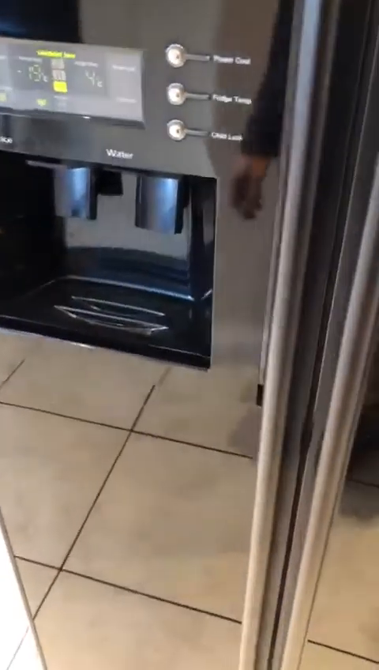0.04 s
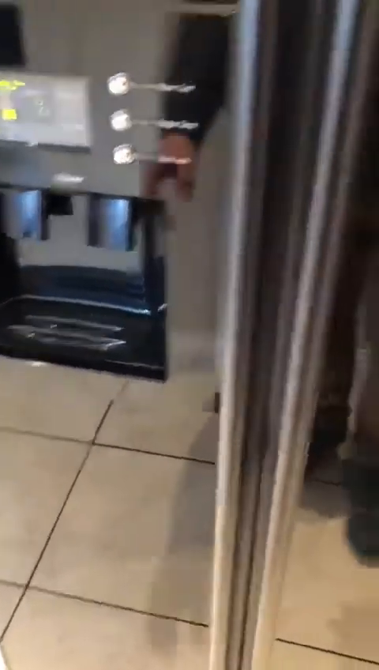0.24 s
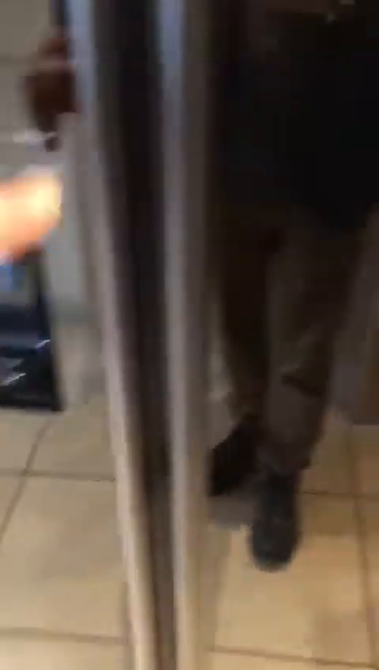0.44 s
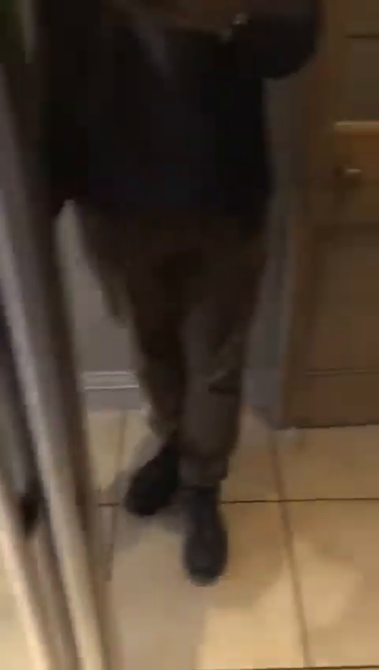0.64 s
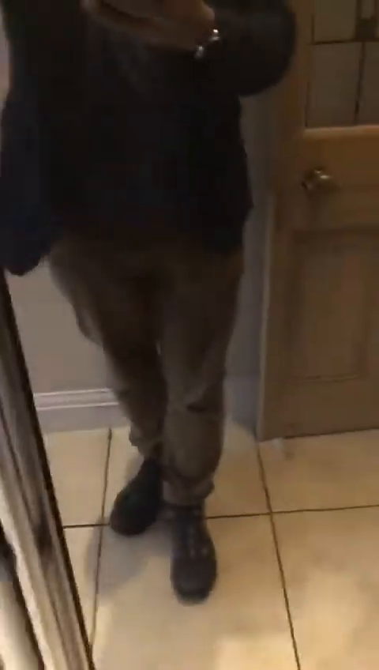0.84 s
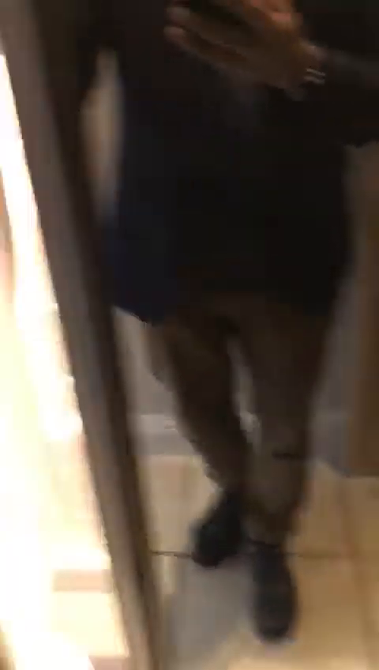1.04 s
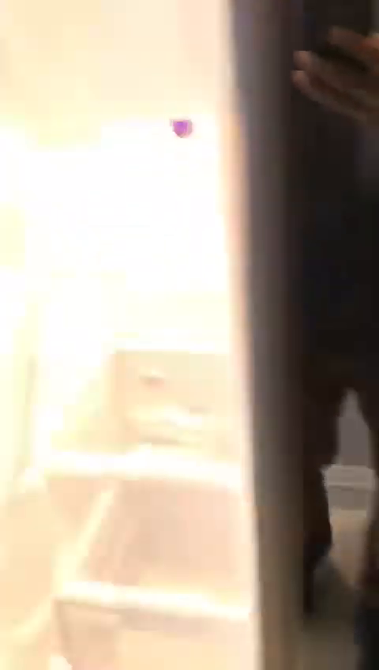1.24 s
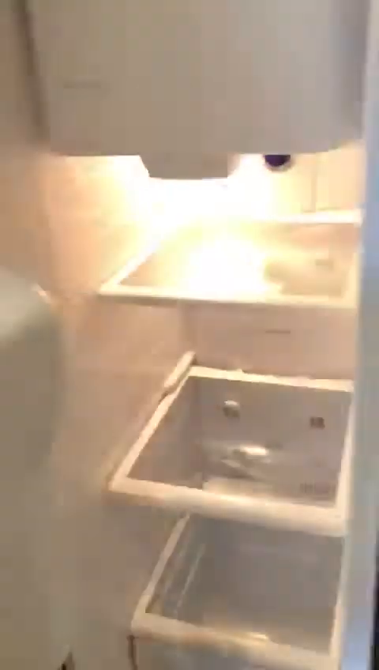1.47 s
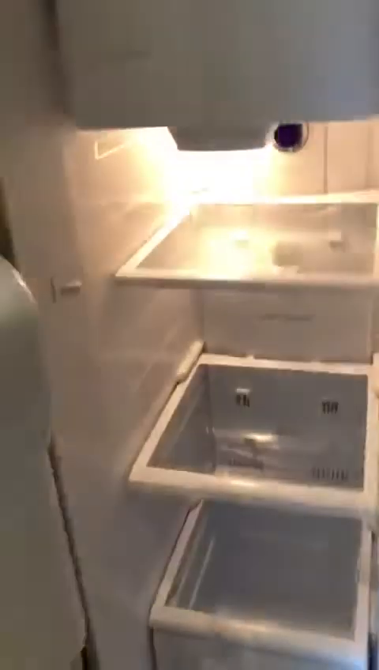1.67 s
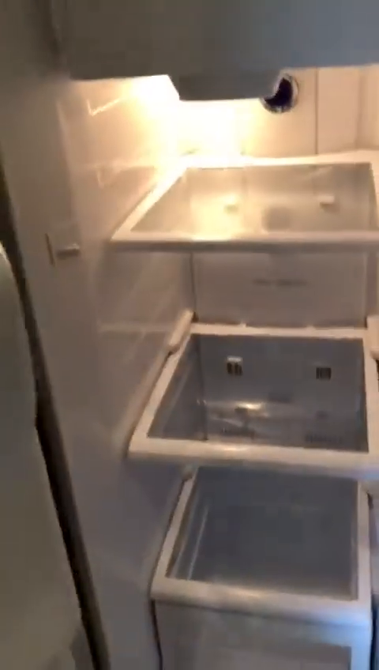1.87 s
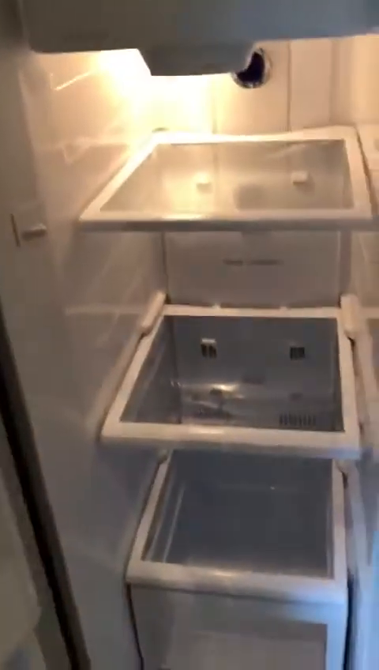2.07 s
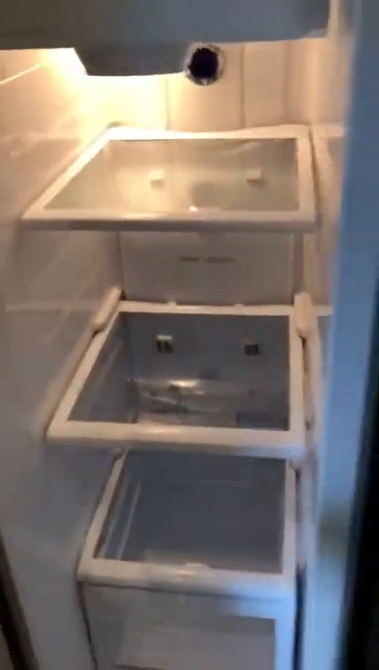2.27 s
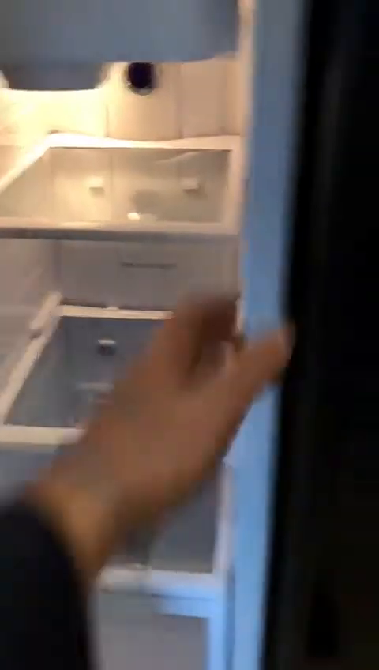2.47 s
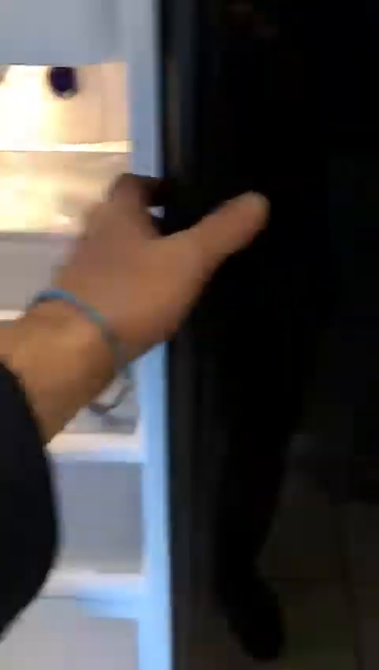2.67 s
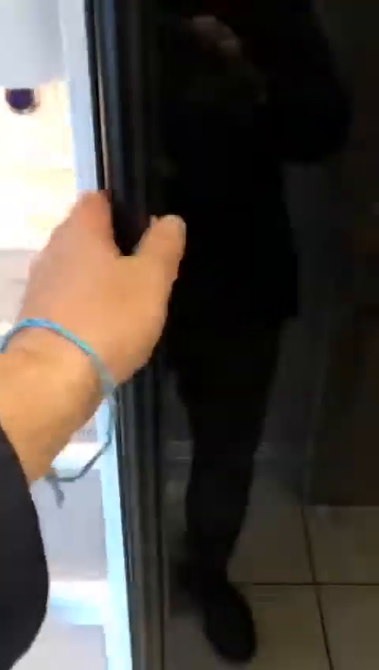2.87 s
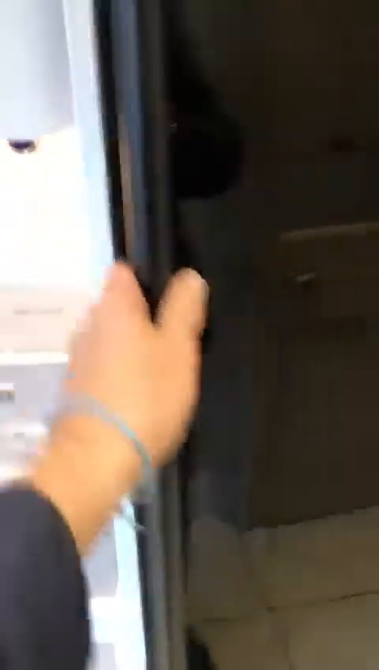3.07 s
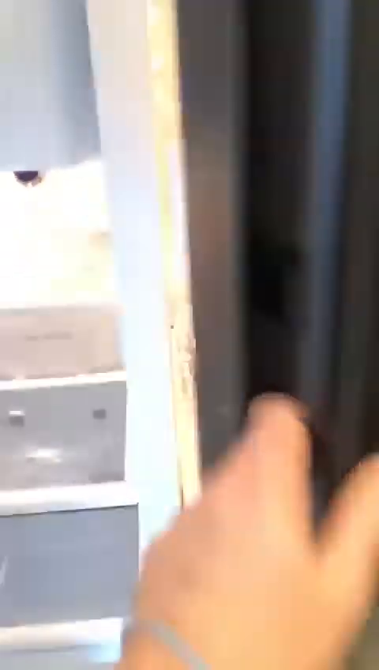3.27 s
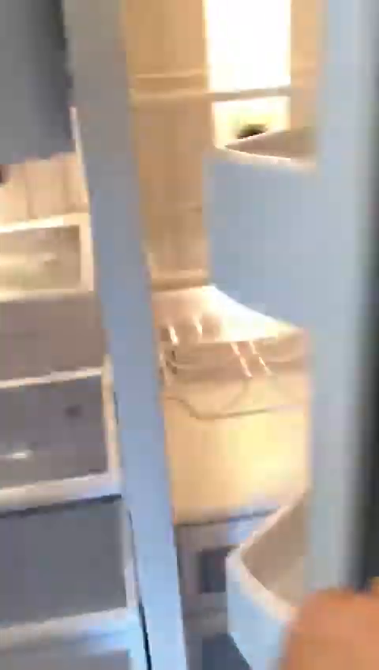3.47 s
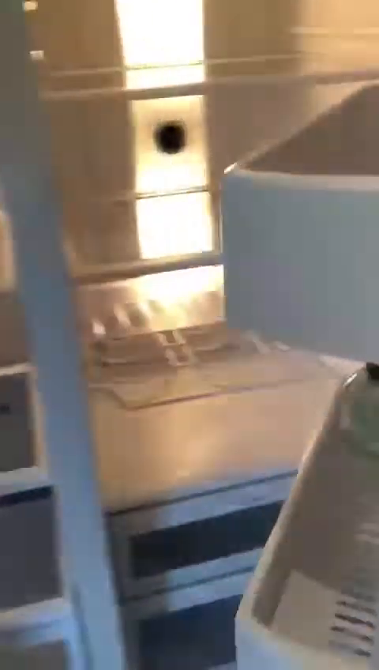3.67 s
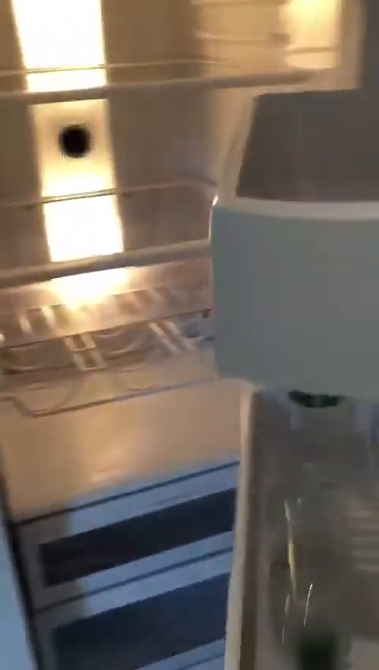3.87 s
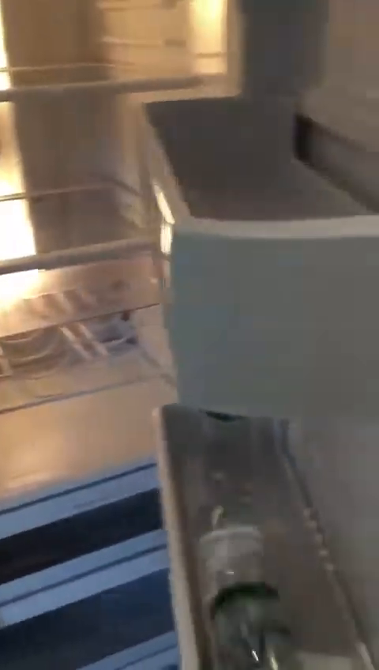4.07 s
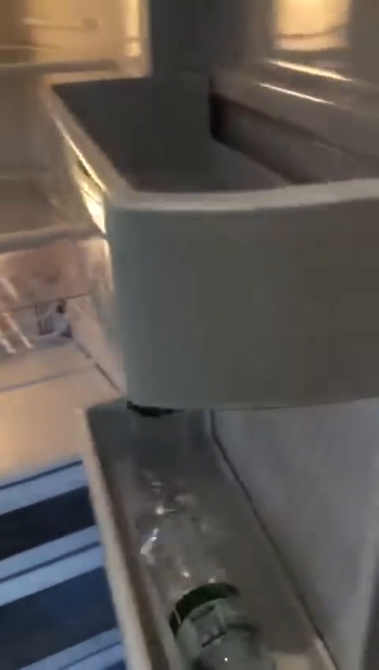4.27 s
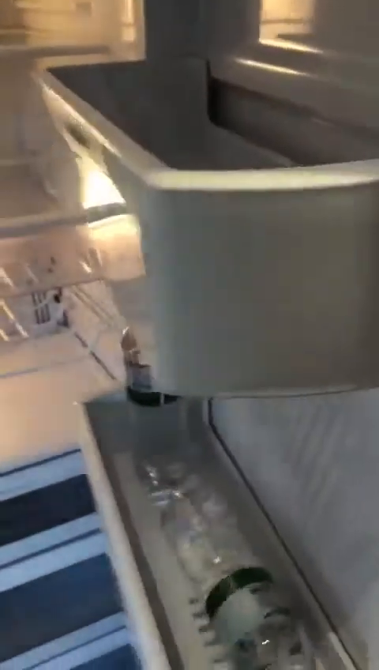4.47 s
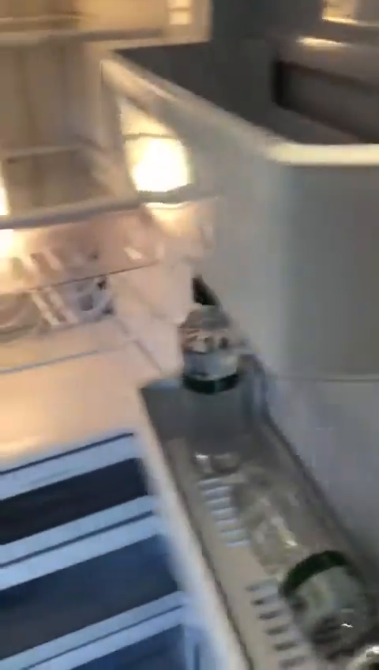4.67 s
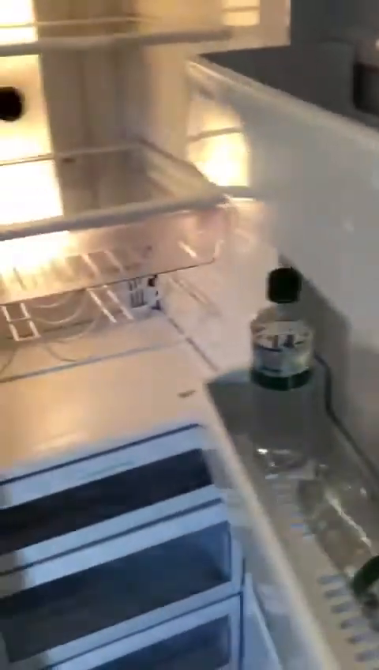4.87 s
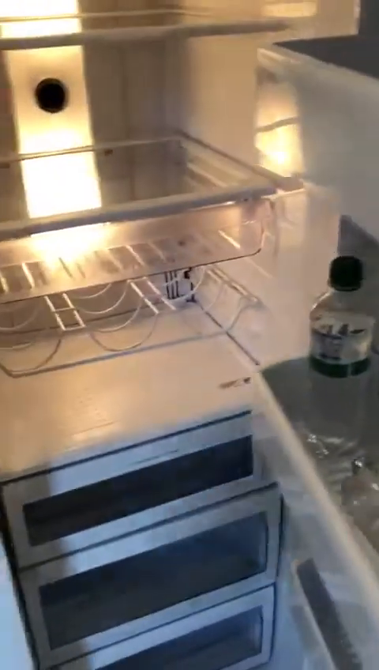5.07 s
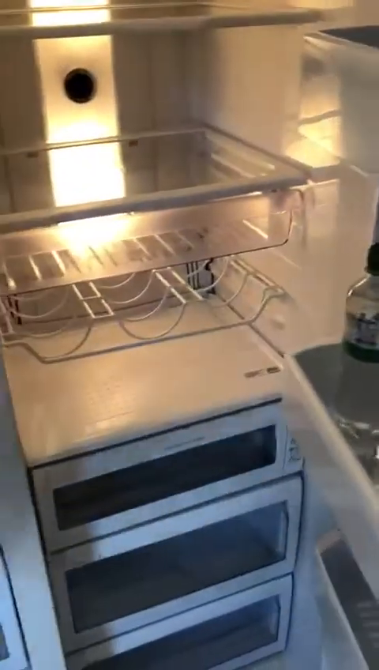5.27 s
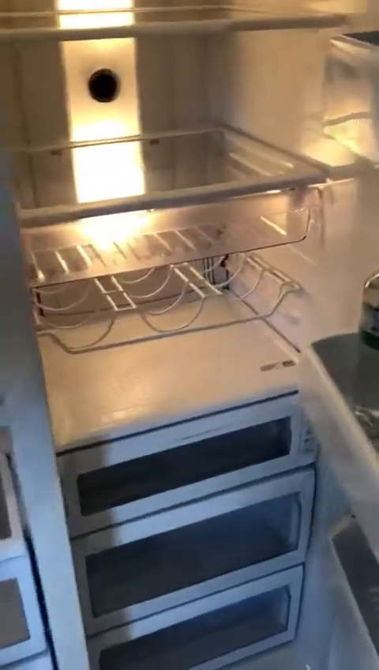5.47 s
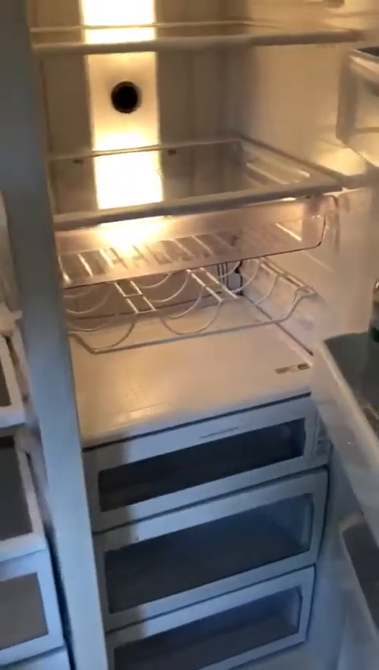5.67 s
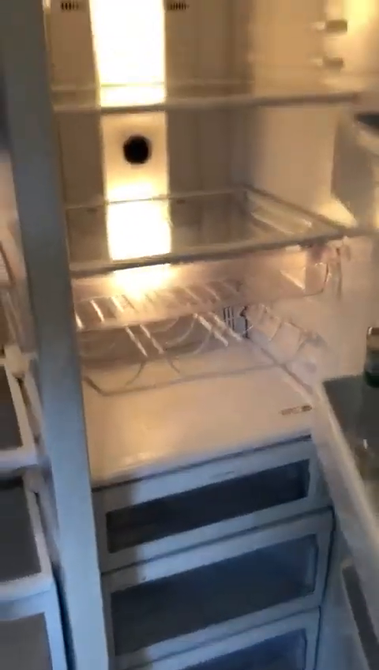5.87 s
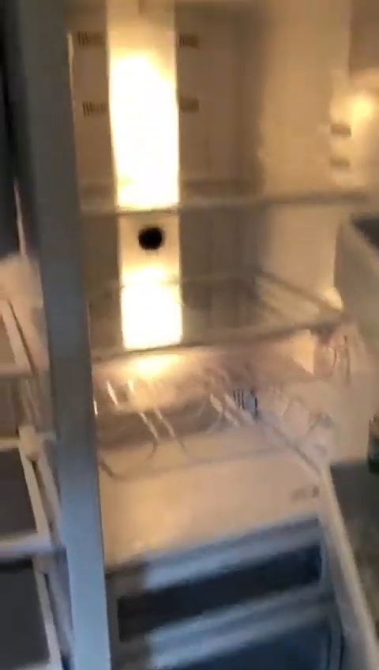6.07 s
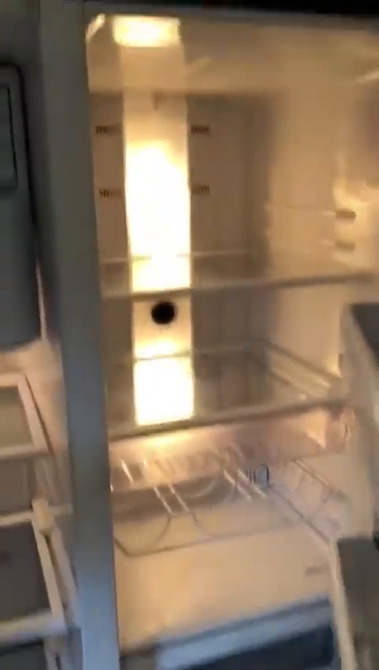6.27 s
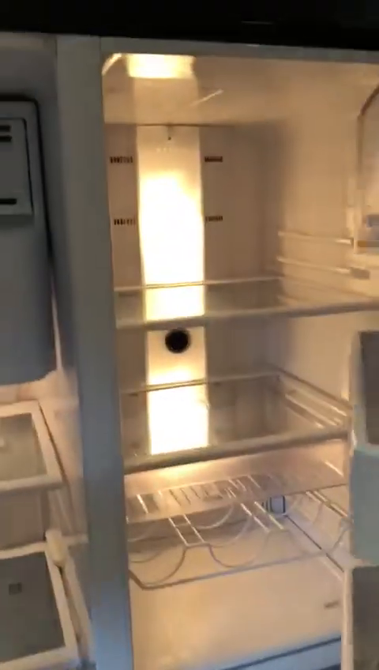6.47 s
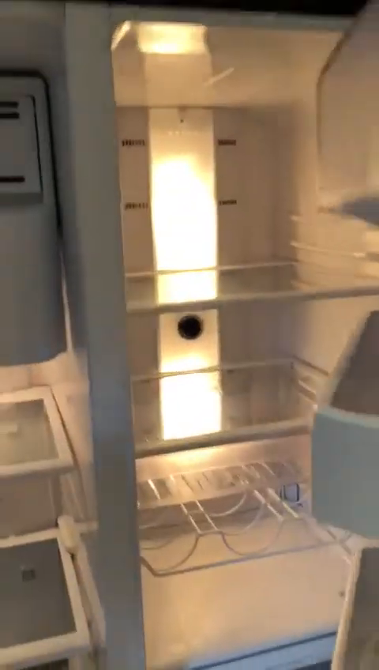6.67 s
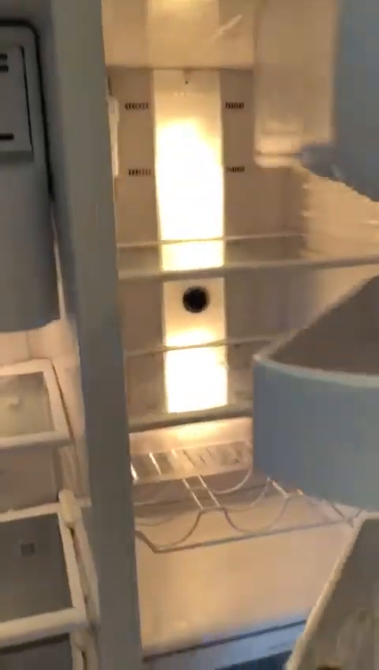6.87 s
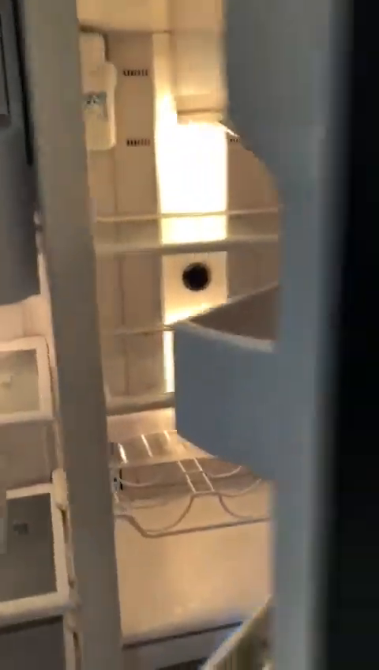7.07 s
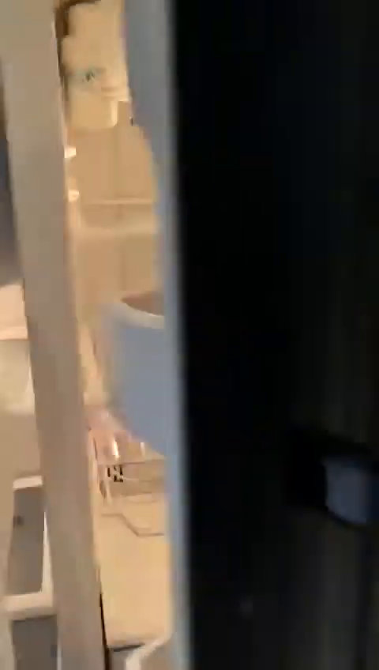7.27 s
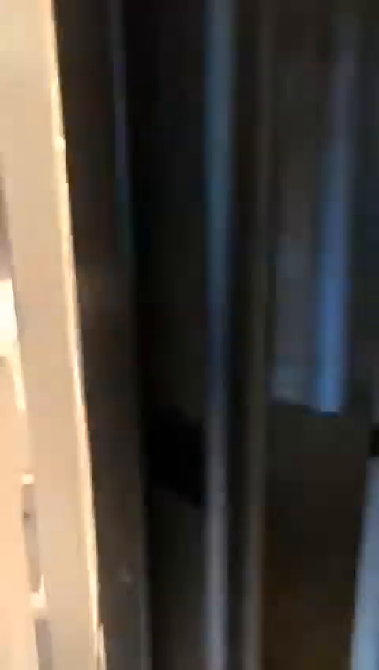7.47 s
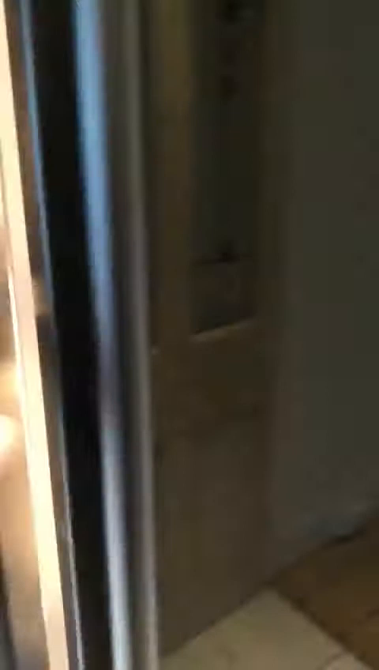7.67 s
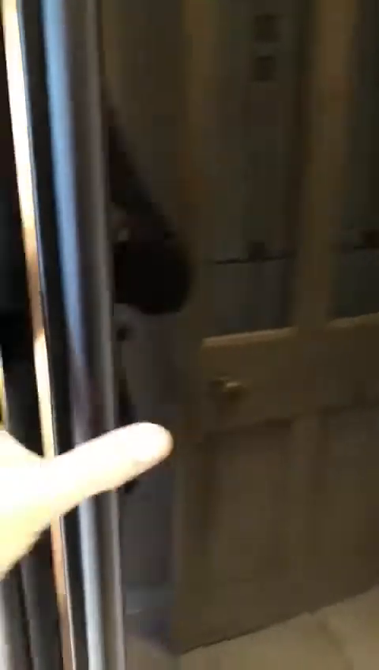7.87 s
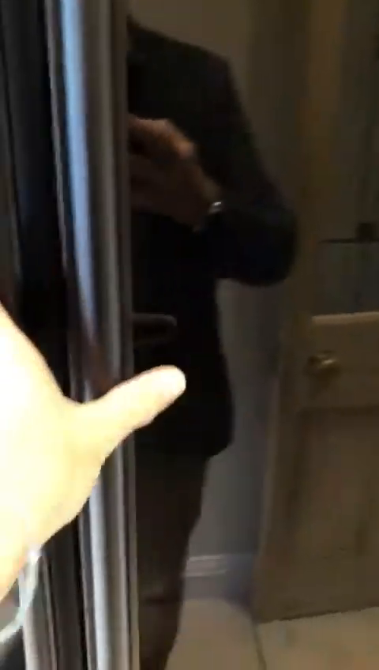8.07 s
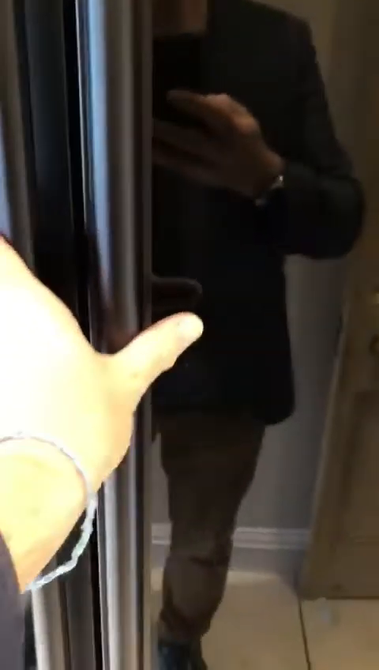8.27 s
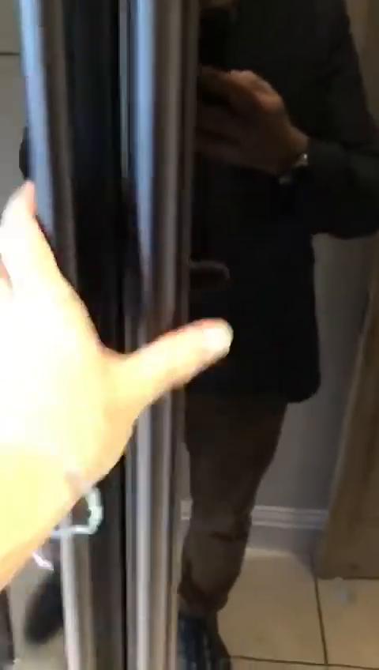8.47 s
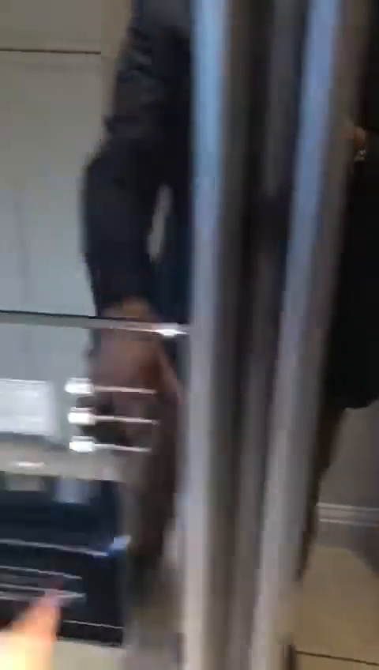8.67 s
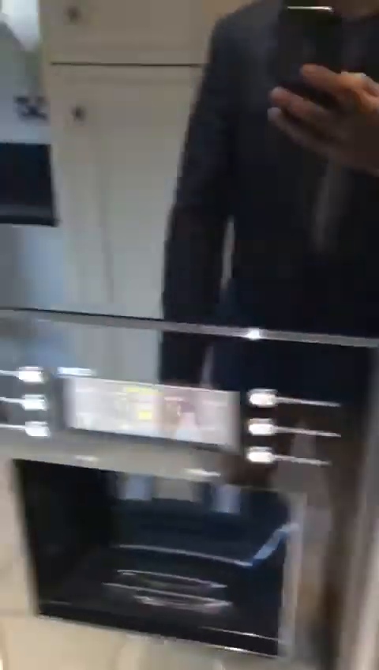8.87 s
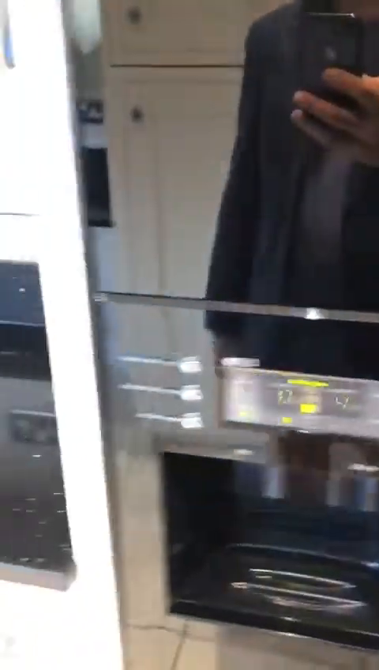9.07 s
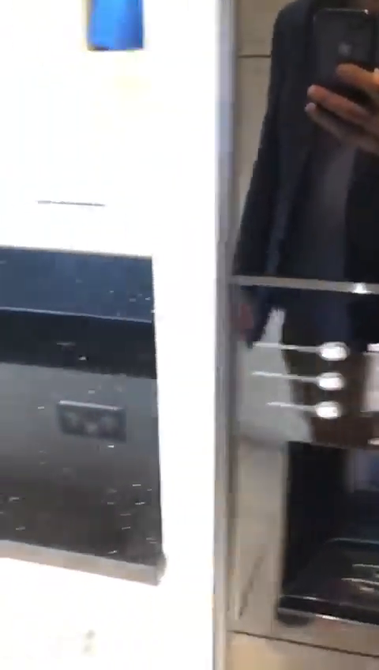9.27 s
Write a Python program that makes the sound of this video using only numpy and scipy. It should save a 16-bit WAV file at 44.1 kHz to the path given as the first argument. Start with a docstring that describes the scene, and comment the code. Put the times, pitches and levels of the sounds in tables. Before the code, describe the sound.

Over a low, quiet hum and dull murmur, sleeves rustle and palms briefly ring metal handles. Two refrigerator doors open one after another with sticky snaps, whooshing air and hollow liner knocks. A bottle falls in a plastic shelf, the loudest event, with rapid shrinking bounces. A quiet spell follows, then two dull door slams with small rebounds in a small reverberant kitchen, heard close.

```python
"""Over a quiet hum in a tiled kitchen, a low rumble and a dull murmur of noise rise and fall; sleeves rustle.
Two large refrigerator doors are pulled open: palms ring steel handles, seals snap and let air rush in.
Hands, shelves and contents knock (damped modes with rattle), and low hums sound as the doors swing.
A plastic bottle topples in a door shelf and bounces to rest; plastic creaks by stick-slip clicks.
At last the doors are pushed shut, land on the cabinet and rebound. A nearby phone clips and limits the band."""
import sys
import numpy as np
from scipy import signal
from scipy.fft import rfft, irfft, next_fast_len
from scipy.io import wavfile
from scipy.ndimage import uniform_filter1d

SR = 44100
rng = np.random.default_rng(int(sys.argv[2]) if len(sys.argv) > 2 else 0)


def digitize_waveform(pressure):
    """Quantize a signal to 16-bit integers and store it at the path in sys.argv[1].

    Rows of a 2-D input are taken as channels; values are limited to [-1, 1].
    """
    field = np.atleast_2d(pressure).T
    bounded = np.clip(field, -1, 1)
    quanta = np.round(bounded * 32767).astype(np.int16)
    wavfile.write(sys.argv[1], SR, quanta)


N = 411453

# low rumble, also under the bounces and the shutting doors, joined by straight lines: [start_s, level_db]
RUMBLE_LEVELS = [(0, -57.5), (.35, -74), (.85, -54.5), (1.7, -66), (2.572, -69.5), (3.3, -55),
                 (3.92, -61.5), (4.18, -39.5), (4.801, -59), (5.5, -76.5), (6.85, -80), (7.101, -63),
                 (7.869, -65), (8.29, -44), (8.7, -64), (9.33, -67)]
# colour of the low rumble and of the flexing doors: [frequency_hz, density_db]
RUMBLE_COLOUR = [(25, -11), (60, 5.5), (120, 4), (200, 3), (320, -47)]
# colour of the dull murmur: [frequency_hz, density_db]
MURMUR_COLOUR = [(120, -27.5), (250, 4), (600, -2), (1200, -5.5), (2200, -12.5), (4000, -28.5)]
# colour of the background hum: [frequency_hz, density_db]
HUM_COLOUR = [(25, -34.5), (60, -20.5), (116, -8), (200, -15.5), (450, -20), (800, -30), (2500, -29.5),
              (6000, -31), (12500, -39)]
# sleeves and hands brush past; level before the swell: [start_s, length_s, level_db, centre_hz]
SWISHES = [(0, 0.43, -66, 3020), (0.438, 1, -63, 3900), (1.124, 0.44, -55, 6640), (2.013, 0.2, -60, 3430),
           (2.401, 0.38, -66.5, 4430), (2.632, 0.091, -52.5, 8100), (2.781, 0.12, -54.5, 7360),
           (3.29, 0.13, -58, 8000), (3.407, 0.051, -49, 6030), (3.732, 0.31, -64, 4770),
           (4.854, 0.13, -63.5, 5590), (6.631, 0.028, -60.5, 4910), (7.032, 0.11, -62, 6500),
           (7.933, 0.96, -63, 3500), (8.509, 0.12, -60, 6350), (8.989, 0.9, -70, 2980)]
# palm slides on a handle; levels before the swell: [start_s, length_s, upper_ring_db, lower_ring_db]
HANDLE_SLIDES = [(0.707, 0.033, -59, -64.5), (2.897, 0.099, -59, -61.5), (3.296, 0.13, -66, -61.5),
                 (7.044, 0.16, -69.5, -68.5), (7.294, 0.051, -56.5, -78), (8.537, 0.057, -61.5, -71.5)]
# rings of the steel handle, upper first: [centre_hz, width_hz]
HANDLE_RINGS = [(8810, 380), (7740, 88)]
# door seals: [first_snaps_s, gap_opens_s, door_free_s, air_rush_db, first_crackle_db, free_crackle_db, flexing_db]
SEALS = [(0.769, 0.889, .95, -40.5, -48, -54.5, -42), (3.022, 3.066, 3.19, -36.5, -28, -50.5, -35)]
# rise before the gap opens: rush, flexing [db_per_s]
SEAL_RISES = (240, 420)
# fall once the door is free: rush, crackle, flexing [db_per_s]
SEAL_FALLS = (123.5, 150, 162.5)
# colour of the air rushing in: [frequency_hz, density_db]
RUSH_COLOUR = [(90, -45), (150, -8), (320, 3), (450, -6.5), (1040, -11.5), (4000, -24), (8000, -37)]
# colour of the peeling gasket: [frequency_hz, density_db]
PEEL_COLOUR = [(900, -3.5), (2200, -7.5), (5500, -1.5), (11000, -7.5), (13000, -29)]
# knocks on the doors by hands, shelves and contents, and sharp snaps of the seals:
# [start_s, ring_db, tick_over_ring_db, strongest_pitch_hz]
KNOCKS_AND_SNAPS = [(0.771, -49.5, 6.5, 410), (0.806, -35.5, -5, 775), (0.831, -51, 15, 864),
                    (0.846, -34.5, -3, 774), (1.15, -35, -29, 1090), (1.532, -51, -1.5, 950),
                    (1.866, -44, -31, 1030), (2.158, -47.5, -35, 198), (2.604, -45.5, -16, 200),
                    (2.618, -33.5, -8, 156), (2.707, -39.5, -3.5, 152), (2.861, -53.5, 3.5, 231),
                    (2.995, -43, 10.5, 692), (3.031, -33, -1, 232), (3.158, -30, -28, 324),
                    (3.416, -40.5, 2, 1100), (3.453, -50, 7, 1100), (3.538, -37, -24.5, 785),
                    (3.69, -49.5, -22.5, 830), (3.826, -46, -24, 799), (5.656, -40.5, -34, 421),
                    (5.67, -45, -35, 167), (6.272, -35, -3.5, 474), (7.035, -50, -18.5, 1100),
                    (7.058, -55.5, -9, 1900), (7.309, -31, -6.5, 340), (7.642, -45.5, -13, 1110),
                    (7.87, -44.5, -50, 890), (7.947, -38, -22, 950), (8.857, -49, -12, 250),
                    (9.068, -51.5, -30, 157)]
# modes of the door liner, lowest first: [frequency_hz, level_db, t60_s]
LINER_MODES = [(156.2, -5.5, 0.082), (207.3, -3.5, 0.5), (350, -0.5, 0.14), (419.6, -2, .22),
               (550, 0.5, 0.058), (753, 2.5, 0.055), (1135, -3, 0.1), (1291.5, -2, 0.25),
               (1677, -2.5, 0.066), (2020, -1, 0.11), (2670, -9, 0.13), (3570, -6.5, 0.15)]
# colour of the bright contact ticks: [frequency_hz, density_db]
TICK_COLOUR = [(500, -30), (1200, 4), (8000, -6), (13000, -9)]
# low modes of the cabinet body: [frequency_hz, level_db, t60_s]
BODY_MODES = [(66.5, -3, 0.43), (96.9, -2, 0.26), (147.4, 3.5, 0.12)]
# brief low hums as the doors swing; level before the swell: [start_s, length_s, level_db, pitch_hz]
SWING_HUMS = [(3.17, 0.77, -53.5, 63), (4.45, 0.38, -45.5, 166), (5.201, 0.22, -64.5, 116.5),
              (5.656, 0.65, -68.5, 207)]
# the bottle on the shelf: [start_s, ring_db, tick_over_ring_db, strongest_pitch_hz]
BOUNCES = [(3.957, -34, -27.5, 868), (3.981, -5.5, -17, 585), (3.985, -23, 8, 460),
           (4.034, -23.5, -26, 640), (4.107, -17, -13, 450), (4.146, -12.5, -19, 730),
           (4.173, -20.5, -8, 460), (4.247, -16.5, -20, 457), (4.29, -31, -30, 900),
           (4.328, -20, -13.5, 640), (4.391, -24, -18, 373), (4.446, -25, -32, 280),
           (4.51, -28, -14.5, 874), (4.553, -34.5, -13, 616), (4.599, -41, -21, 634),
           (4.635, -44, -28, 453), (4.677, -56, 11, 1900), (4.718, -37.5, -41, 700), (4.851, -46, -17, 640),
           (4.89, -60, 3, 1000)]
# modes of the door shelf: [frequency_hz, level_db, t60_s]
SHELF_MODES = [(148, -9, 0.13), (281, -1.5, 0.29), (452.4, -1, 0.14), (643.5, -2.5, 0.17), (907, -2, 0.091),
               (1002, -3.5, 0.06), (1219, -8, 0.11), (1415, -14.5, 0.12), (1494, -9, 0.1),
               (1826, -12.5, 0.12), (2657, -20, 0.13)]
# plastic parts scrape and creak; level before the swell: [start_s, length_s, level_db, upper_over_lower_rings_db]
SCRAPES = [(4.979, 0.18, -66, 0.5), (5.979, 0.2, -67, 0), (6.01, 0.072, -58.5, -5),
           (6.972, 0.1, -68.5, 11.5), (7.028, 0.18, -67, 4), (9.015, 0.16, -63, -7.5)]
# rings of the creaking plastic: [centre_hz, width_hz, level_db]
CREAK_RINGS = [(1054, 88, 1), (1440, 246, -1), (2770, 136, 0), (3207, 400, -2)]
# the doors land and rebound: [start_s, ring_db, tick_over_ring_db, thud_over_ring_db, strongest_pitch_hz]
SHUTS = [(8.066, -36.5, 9.5, -11, 1100), (8.076, -14, -12, -6.5, 300), (8.13, -25.5, -7.5, -12, 690),
         (8.337, -26.5, 0, -16, 1300), (8.341, -11.5, -24, -10.5, 550), (8.389, -27, -12, -14, 640)]
# modes of the cabinet where the doors land: [frequency_hz, level_db, t60_s]
CABINET_MODES = [(235, -0.5, 0.061), (352, 4.5, 0.031), (452, 0, 0.022), (654, 8, 0.0046), (822, 2.5, 0.02),
                 (1112, -4, 0.03), (1780, 2, 0.011)]
# reverberation of the kitchen: [frequency_hz, t60_s]
KITCHEN_DECAY = [(100, 0.36), (260, 0.49), (700, 0.58), (1840, 0.56), (4850, 0.57), (11000, 0.2)]

HUM_DB = -65.5
MURMUR_DB, CALM_DB, MURMUR_SHARE = -61, -63, 0.74  # murmur level when rumble is at CALM_DB; share of its swells
SWISH_OCTAVES = 1.9  # between the -4 dB points
SEAL_TAIL_S = .25
GAP_HZ, GAP_WIDTH_HZ, GAP_DB = (1100, 300), 270, -5  # first and last pitch; width; level over rush
GAP_RISE_DB_PER_S = 160
KNOCK_THUD_DB, THUD_LOSS_DB = -4, 9.5  # over ring at the lowest liner mode; lost per octave of pitch
BOTTLE_THUD_DB = -18  # over ring
EDGE_HZ = 11800


def gain_of(db):
    """Level law: amplitude is ten to the power of dB over twenty."""
    return 10 ** (np.asarray(db) / 20)


def evened(x):
    """Normalisation of power: scales x to rms 1."""
    return x / np.sqrt(np.mean(x ** 2) + 1e-20)


def read(points, hz):
    """Logarithmic frequency scale: interpolates a table between its points."""
    f, value = np.transpose(points)
    return np.interp(np.log(hz + 1), np.log(f + 1), value)


def add(mix, s, sound):
    """Superposition: mixes a sound in at s seconds."""
    part = mix[round(s * SR):][:len(sound)]
    part += sound[:len(part)]


def coloured(x, spectrum):
    """Linear filtering: weights the spectrum of x by the table, at rms 1."""
    size = next_fast_len(len(x))
    weights = gain_of(read(spectrum, np.fft.rfftfreq(size, 1 / SR)))
    return evened(irfft(rfft(x, size) * weights, size)[:len(x)])


def patchy(spectrum, patchy_db):
    """Non-stationary noise: its colour drifts in random patches of time and frequency."""
    frames = N // 128 + 5
    real, imaginary, patches = rng.standard_normal((frames, 257, 3)).T
    patches = uniform_filter1d(patches, size=8, axis=0)  # over frequency
    patches = evened(uniform_filter1d(patches, size=20, axis=1))  # over time
    z = (real + 1j * imaginary) * gain_of(patchy_db * patches)
    noise = signal.istft(z, nperseg=512, noverlap=384)[1][:N]
    return coloured(noise, spectrum)


def stroke(length_s, band, grit_db):
    """Amplitude modulation: band noise made uneven by grit swells fast and fades."""
    u = np.arange(0, 1, 1 / (length_s * SR))
    noise, grit = rng.standard_normal((2, len(u)))
    grit = evened(uniform_filter1d(grit, size=300))
    swell = np.sin(np.pi * u ** 0.54) ** 0.75
    return coloured(noise, band) * gain_of(grit_db * grit) * swell


def resonate(x, hz, width):
    """Resonance: shifting the pitch to zero lets a one-pole low-pass follow the curve hz, at gain 1."""
    turn = np.exp(2j * np.pi * np.cumsum(hz * np.ones(len(x))) / SR)
    r = np.exp(-np.pi * width / SR)
    return 2 * (turn * signal.lfilter([1 - r], [1, -r], x / turn)).real


def ring(modes, t, rise_s):
    """Modal decay: each mode is a close pair of damped sines with random levels and detuning; peak 1."""
    hz, db, t60 = np.transpose(modes)[:, :, None]
    rise = 1 - np.exp(-t / rise_s * (hz / 500) ** .6)  # low modes build more slowly
    sound = 0
    for spot, detune in rng.standard_normal((2, 2, len(modes), 1)):
        decay = gain_of(db + 2.7 * spot - 60 * t / t60)
        sound = sound + rise * decay * np.sin(2 * np.pi * hz * (1 + .013 * detune) * t)
    # extra weight at the start, fading fast: contact damps the first swings
    sound = sound.sum(0) * (1 + 2 * np.exp(-t / .013))
    return sound / abs(sound).max()


def blows(table, modes, rattle_db, rattle_s, spray, tail, rise_s, focus_db):
    """Impact excitation: each blow rings modes with a like-coloured rattle, a bright tick and a low thud."""
    out, t = np.zeros(N), np.arange(SR // 2) / SR
    for s, db, tick_db, thud_db, pitch_hz in table:
        # the spot that is hit favours the modes near its pitch
        struck = np.array(modes, float)
        octaves = abs(np.log2(struck[:, 0] / pitch_hz))
        struck[:, 1] -= focus_db * np.sqrt(0.043 + octaves)

        peaks = struck[:, :2] - [0, struck[:, 1].max()]
        colour = [(60, -40), *peaks, (6000, -30), (12000, -42)]
        rattle = coloured(rng.standard_normal(len(t)), colour)
        rattle *= np.exp(-t / rattle_s) * (1 - np.exp(-2 * t / rise_s))

        tick = coloured(rng.standard_normal(len(t)), TICK_COLOUR)
        tick *= np.exp(-t / .002) + spray * np.exp(-t / .011) + tail * np.exp(-t / .045)
        tick *= 1 - np.exp(-4 * t / rise_s)

        body = ring(struck, t, rise_s) + gain_of(rattle_db) * rattle / abs(rattle).max()
        thud = gain_of(thud_db) * ring(BODY_MODES, t, 0.0025)
        add(out, s, gain_of(db) * (body + gain_of(tick_db) * tick + thud))
    return out


def background_hum():
    """Steady-level noise: a low-weighted spectrum with a drifting colour forms a quiet hum."""
    return gain_of(HUM_DB) * patchy(HUM_COLOUR, 2.6)


def rumble_and_murmur():
    """Common modulation: low rumble and dull murmur rise and fall together, also under bounces and shuts."""
    rumble_db = np.interp(np.arange(N) / SR, *np.transpose(RUMBLE_LEVELS))
    murmur_db = MURMUR_DB + MURMUR_SHARE * (rumble_db - CALM_DB)
    rumble = gain_of(rumble_db) * patchy(RUMBLE_COLOUR, 2.5)
    murmur = gain_of(murmur_db) * patchy(MURMUR_COLOUR, 2.2)
    return rumble + murmur


def swishes():
    """Broadband friction: cloth and skin rub in short strokes."""
    out, edge = np.zeros(N), 2 ** (SWISH_OCTAVES / 2)
    for s, length, db, hz in SWISHES:
        band = [(hz / edge ** 2, -24), (hz / edge, -4), (hz, 0), (hz * edge, -4), (hz * edge ** 2, -24)]
        add(out, s, gain_of(db) * stroke(length, band, grit_db=2.0))
    return out


def handle_slides():
    """Friction-excited resonance: skin sounds two rings of the steel handle."""
    out = np.zeros(N)
    for s, length, *levels in HANDLE_SLIDES:
        for db, (hz, width) in zip(levels, HANDLE_RINGS):
            half, skirt = width / 2, 4 * width
            band = [(hz - skirt, -30), (hz - half, -6), (hz, 0), (hz + half, -6), (hz + skirt, -30)]
            add(out, s, gain_of(db) * stroke(length, band, grit_db=5))
    return out


def seals():
    """Adhesive release and inflow: the gasket snaps loose, air rushes through the gap and the door flexes."""
    out = np.zeros(N)
    rush_rise, flex_rise = SEAL_RISES
    rush_fall, peel_fall, flex_fall = SEAL_FALLS
    for start, opens, free, rush_db, first_db, last_db, flex_db in SEALS:
        t = np.arange(start, free + SEAL_TAIL_S, 1 / SR)
        before, after = np.maximum(opens - t, 0), np.maximum(t - free, 0)
        rush_gain = gain_of(rush_db - rush_rise * before - rush_fall * after)
        peel_gain = gain_of(np.interp(t, [start, free], [first_db, last_db]) - peel_fall * after)
        flex_gain = gain_of(flex_db - flex_rise * before - flex_fall * after)
        gap_gain = gain_of(rush_db + GAP_DB - GAP_RISE_DB_PER_S * before - rush_fall * after)

        air, snaps, size, low = rng.random((4, len(t)))
        # 3500 snaps per second on average, of random size and sign
        crackle = (snaps < 3500 / SR) * gain_of(-2.4 * np.log(size + 0.046)) * np.sign(air - .5)
        # the gasket gives way unevenly
        lumps = gain_of(3.2 * evened(uniform_filter1d(size - .5, size=350)))
        # the widening gap sings lower
        gap_hz = np.exp(np.interp(t, [start, free], np.log(GAP_HZ)))
        sing = gap_gain * evened(resonate(low - .5, gap_hz, GAP_WIDTH_HZ))

        rush = rush_gain * coloured(air - .5, RUSH_COLOUR)
        peel = peel_gain * coloured(crackle, PEEL_COLOUR)
        flex = flex_gain * coloured(low - .5, RUMBLE_COLOUR)
        sound = lumps * (sing + rush) + np.sqrt(lumps) * peel + flex
        add(out, start, sound * signal.windows.tukey(len(t), .04))
    return out


def knocks_and_snaps():
    """Modal impact: knocks and seal snaps ring the door liner; lower-pitched ones carry more thud."""
    lowest_hz = LINER_MODES[0][0]
    table = []
    for s, db, tick_db, hz in KNOCKS_AND_SNAPS:
        thud_db = KNOCK_THUD_DB - THUD_LOSS_DB * np.log2(hz / lowest_hz)
        table.append((s, db, tick_db, thud_db, hz))
    return blows(table, LINER_MODES, rattle_db=1.5, rattle_s=0.017,
                 spray=0.52, tail=0.11, rise_s=0.004, focus_db=20)


def swing_hums():
    """Narrow-band noise: each brief low hum has one pitch as the doors swing."""
    out = np.zeros(N)
    for s, length, db, hz in SWING_HUMS:
        band = [(hz / 2, -70), (hz / 1.25, -18), (hz, 0), (hz * 1.25, -18), (hz * 2, -70)]
        add(out, s, gain_of(db) * stroke(length, band, grit_db=-2.5))
    return out


def bottle_bounces():
    """Repeated impact: the toppled bottle strikes the modes of the door shelf until it rests."""
    table = [(s, db, tick_db, BOTTLE_THUD_DB, hz) for s, db, tick_db, hz in BOUNCES]
    return blows(table, SHELF_MODES, rattle_db=1.0, rattle_s=.012,
                 spray=0.59, tail=0.055, rise_s=0.0045, focus_db=5.5)


def scrapes():
    """Stick-slip: uneven clicks excite the resonances of the plastic."""
    out = np.zeros(N)
    for s, length, db, upper_db in SCRAPES:
        u = np.arange(0, 1, 1 / (length * SR))
        slip, size = rng.random((2, len(u)))
        clicks = (slip < 1500 / SR) * (size - .5)  # 1500 per second on average
        bend = 1 + 0.044 * np.sin(2 * np.pi * (u + rng.random()))  # the part bends as it is rubbed
        rings = 0
        for hz, width, level in CREAK_RINGS:
            ringing = resonate(resonate(clicks, hz * bend, 2 * width), hz * bend, width)
            rings = rings + gain_of(level + upper_db * (hz > 2000)) * evened(ringing)
        swell = np.sqrt(np.sin(np.pi * u ** 0.32))
        add(out, s, gain_of(db) * evened(rings) * swell)
    return out


def door_shuts():
    """Heavily damped impact: the doors land on the cabinet and rebound."""
    return blows(SHUTS, CABINET_MODES, rattle_db=-4, rattle_s=0.004,
                 spray=0.3, tail=0.12, rise_s=.002, focus_db=11)


def kitchen(x):
    """Reverberation: sparse taps of random sign die at a speed set per band; three tails take turns."""
    out, at = np.zeros(N), np.arange(300, SR - 20, 20)
    for k in range(3):
        taps = np.zeros(SR)
        taps[at + rng.integers(0, 20, len(at))] = rng.choice([-1., 1.], len(at))
        hz, t, z = signal.stft(taps, SR, nperseg=256)
        decay = gain_of(-60 * t / read(KITCHEN_DECAY, hz)[:, None])
        tail = signal.istft(z * decay, SR, nperseg=256)[1]
        # each turn is a 7 Hz cosine, a third of a cycle from the next
        turn = np.sqrt(2 / 3) * np.cos(2 * np.pi * (7 * np.arange(N) / SR + k / 3))
        out += signal.fftconvolve(x * turn, tail / np.linalg.norm(tail))[:N]
    return out


def scene():
    """Superposition: direct blows and friction, their share of the room, and the quiet background."""
    quiet = background_hum() + rumble_and_murmur()
    rubbing = swishes() + handle_slides() + seals() + swing_hums() + scrapes()
    knocking = knocks_and_snaps()
    bottle = bottle_bounces()
    shuts = door_shuts()
    wet = gain_of(-8) * rubbing + gain_of(-6.0) * knocking + gain_of(-9.5) * bottle + gain_of(-7.0) * shuts
    return (quiet + rubbing + knocking + bottle + shuts + kitchen(wet))[None]


def record(dry):
    """Saturation and band limit: the phone clips the very highest peaks, then low-passes."""
    clipped = np.clip(dry, -.9, .9)
    low_pass = signal.firwin(255, EDGE_HZ, window=("kaiser", 9), fs=SR)
    return signal.oaconvolve(clipped, low_pass[None], "same")


dry = scene()
out = record(dry)
digitize_waveform(out)
```